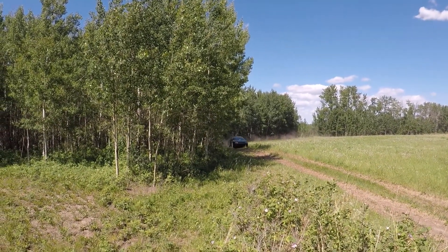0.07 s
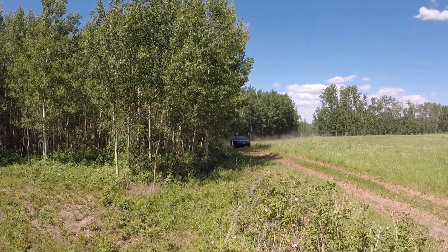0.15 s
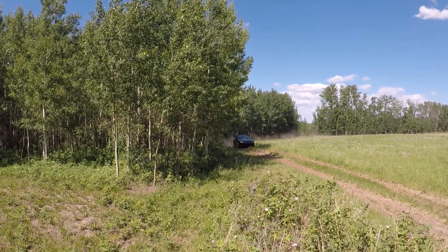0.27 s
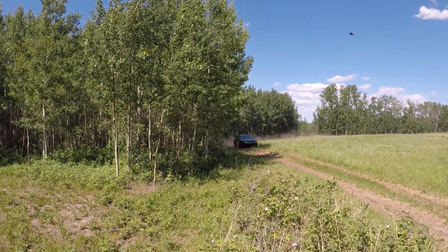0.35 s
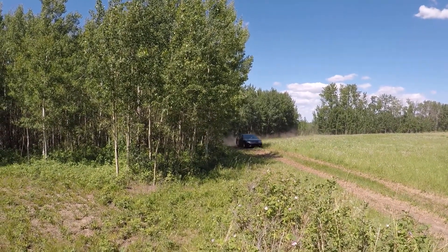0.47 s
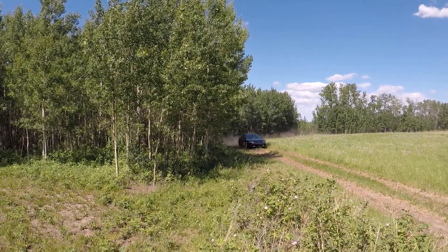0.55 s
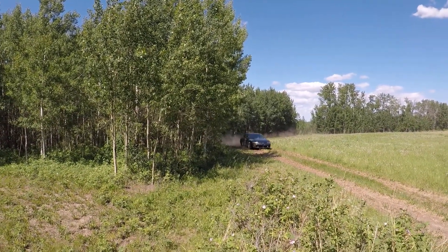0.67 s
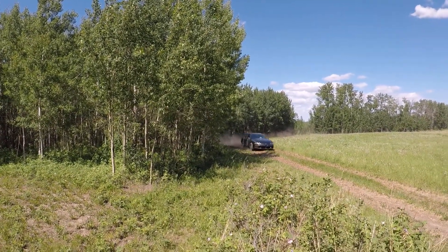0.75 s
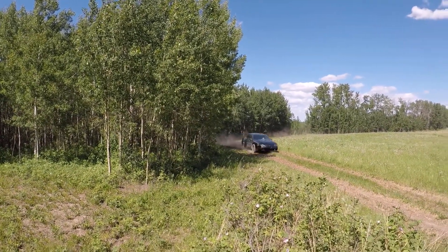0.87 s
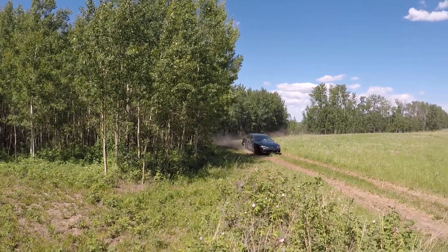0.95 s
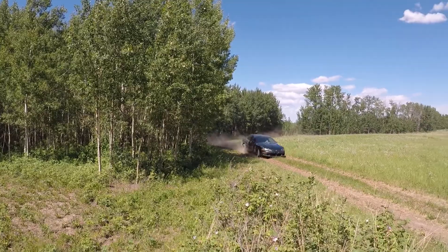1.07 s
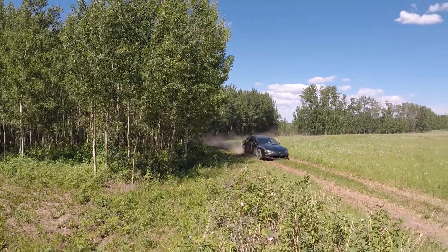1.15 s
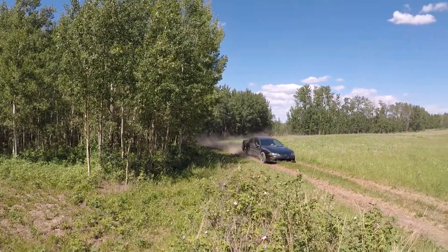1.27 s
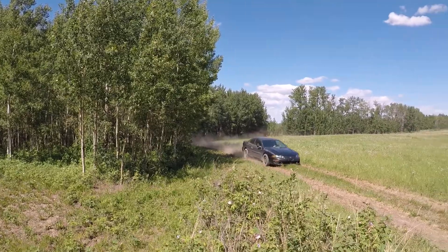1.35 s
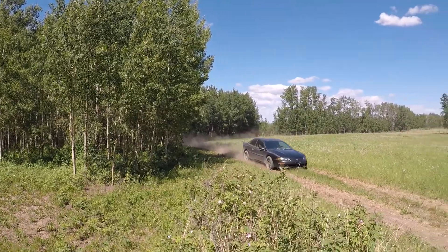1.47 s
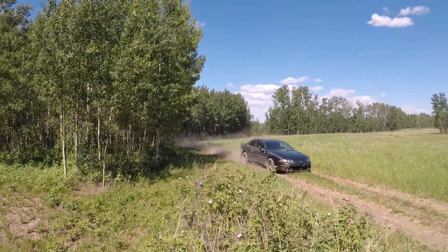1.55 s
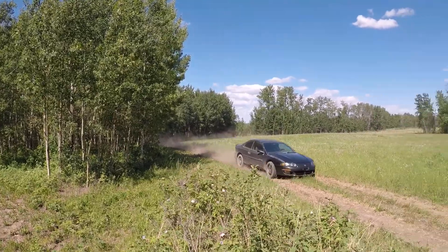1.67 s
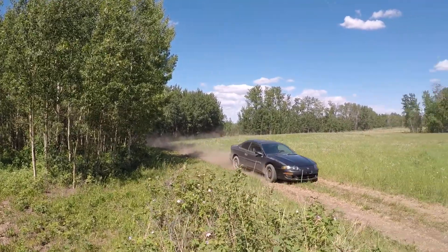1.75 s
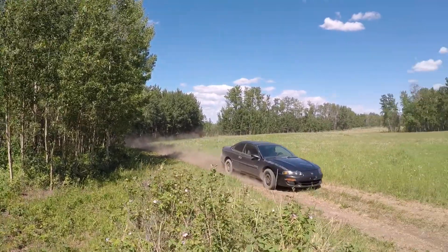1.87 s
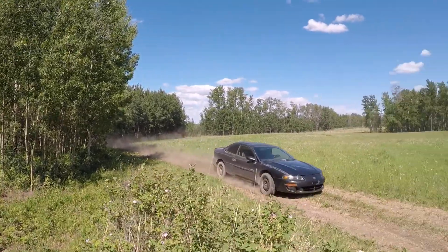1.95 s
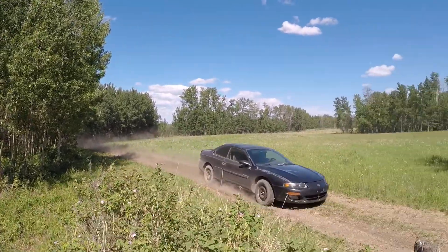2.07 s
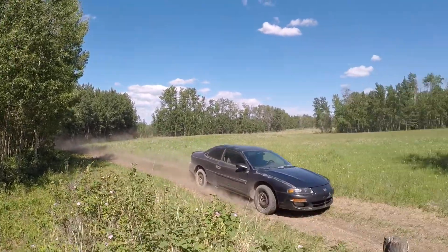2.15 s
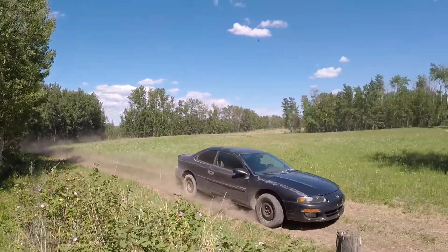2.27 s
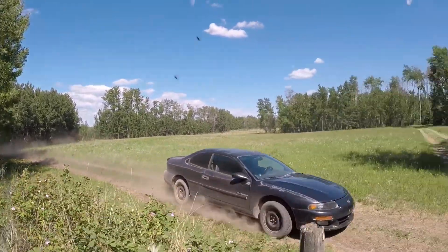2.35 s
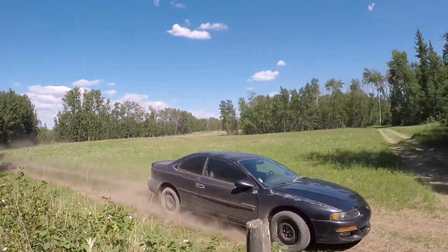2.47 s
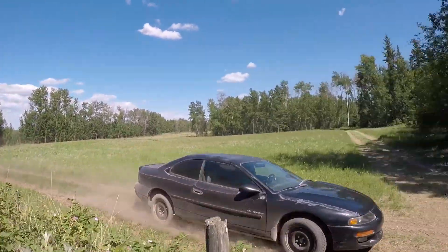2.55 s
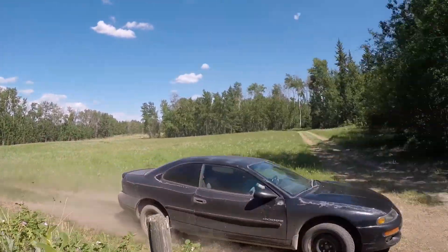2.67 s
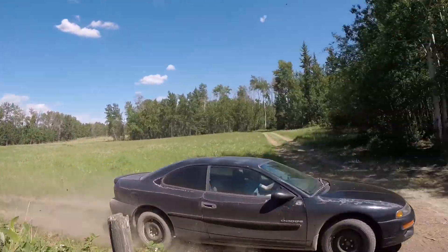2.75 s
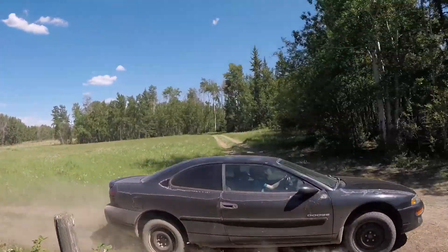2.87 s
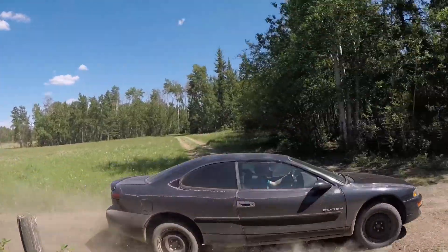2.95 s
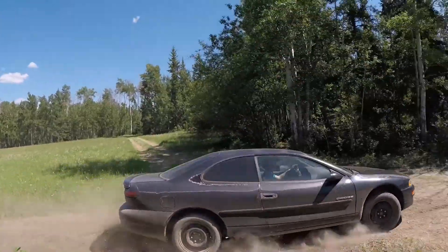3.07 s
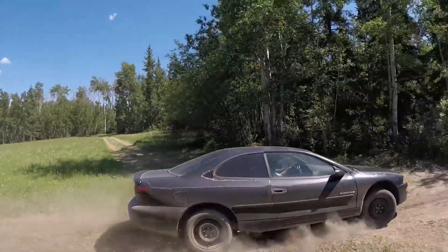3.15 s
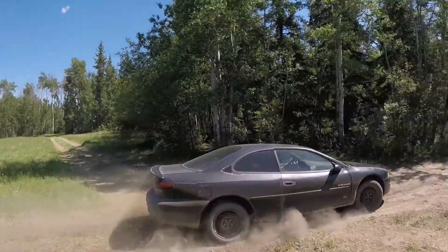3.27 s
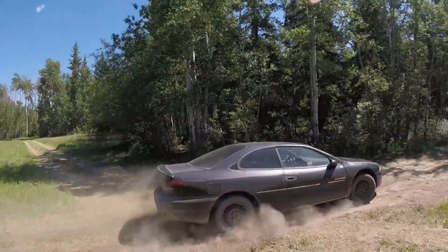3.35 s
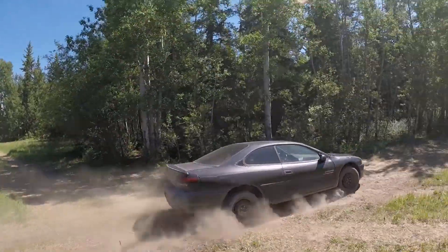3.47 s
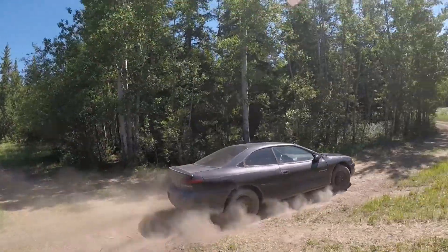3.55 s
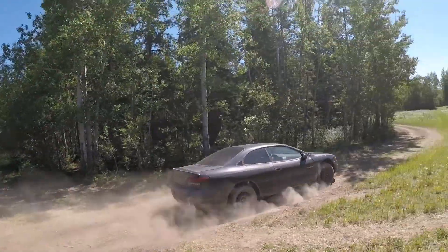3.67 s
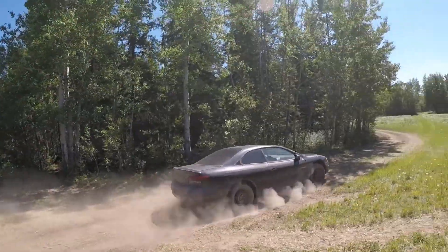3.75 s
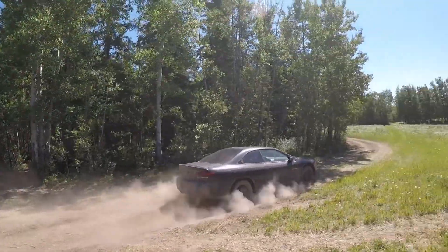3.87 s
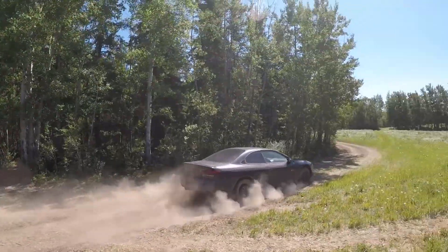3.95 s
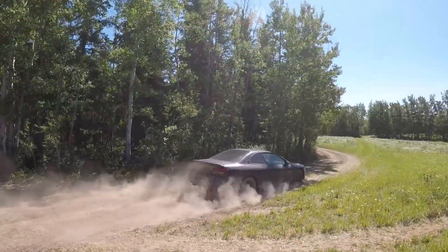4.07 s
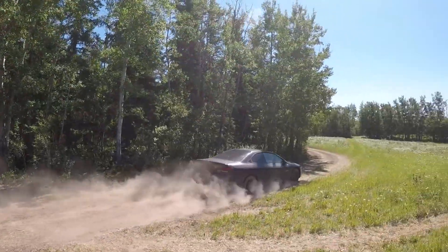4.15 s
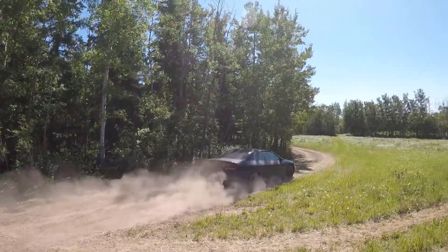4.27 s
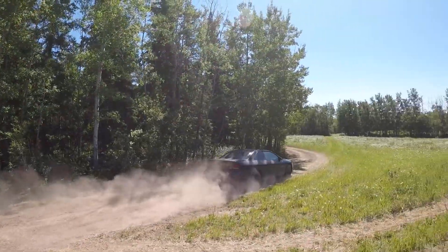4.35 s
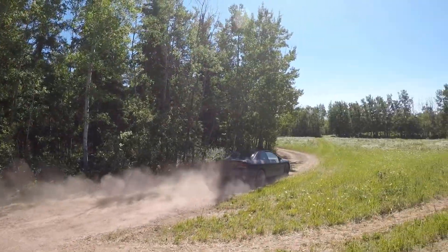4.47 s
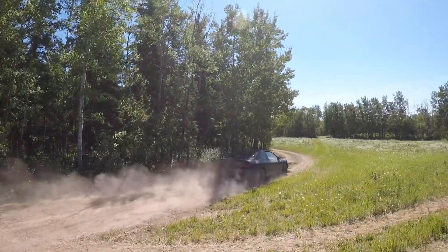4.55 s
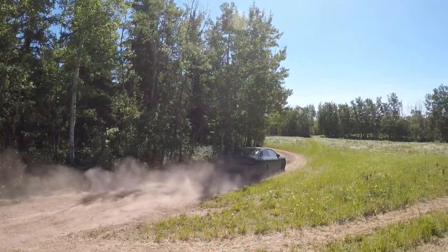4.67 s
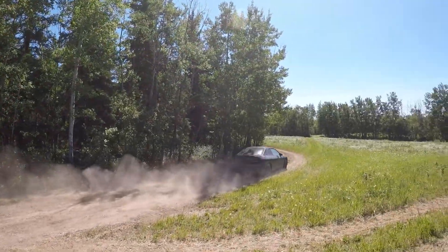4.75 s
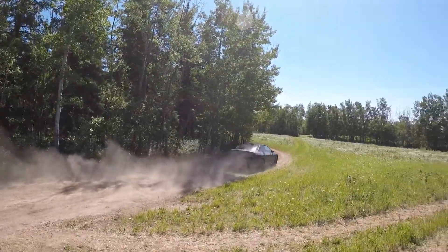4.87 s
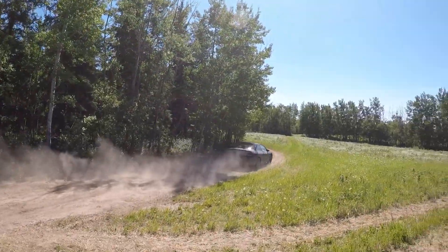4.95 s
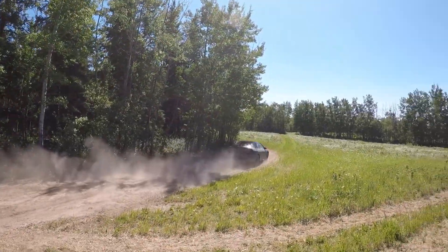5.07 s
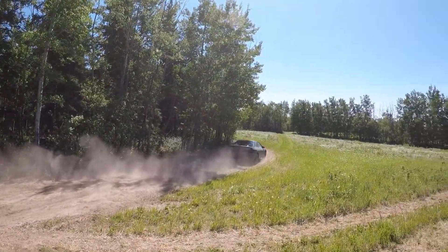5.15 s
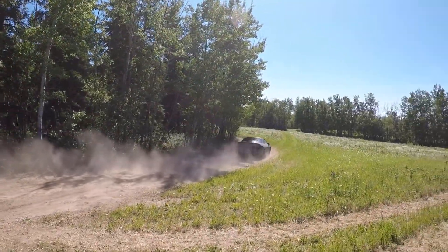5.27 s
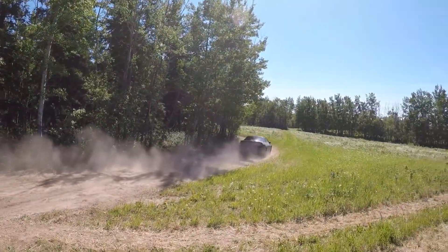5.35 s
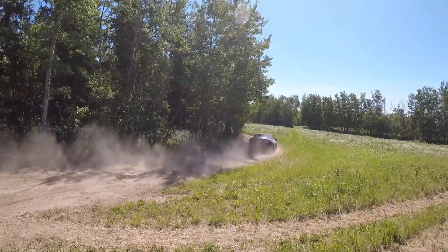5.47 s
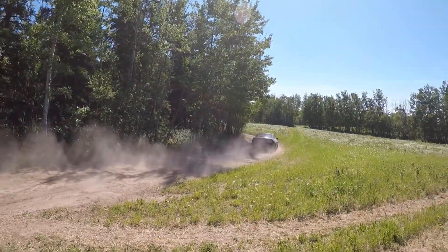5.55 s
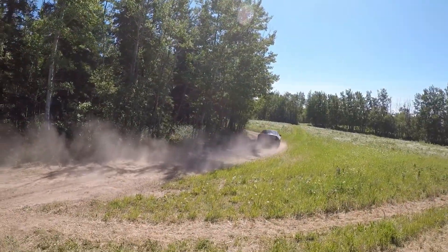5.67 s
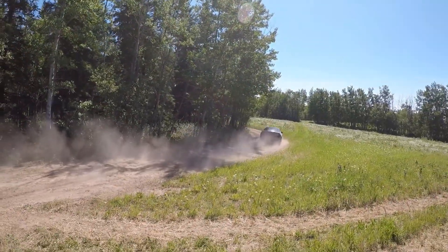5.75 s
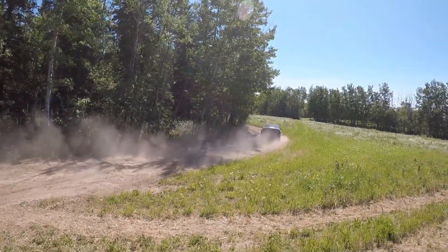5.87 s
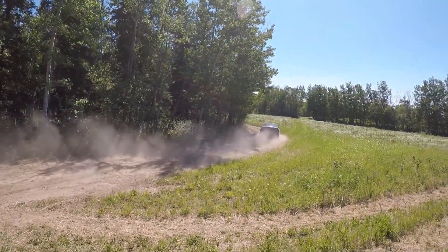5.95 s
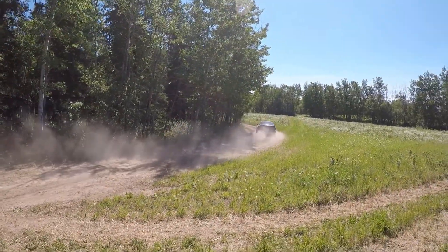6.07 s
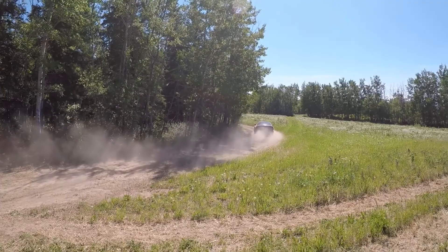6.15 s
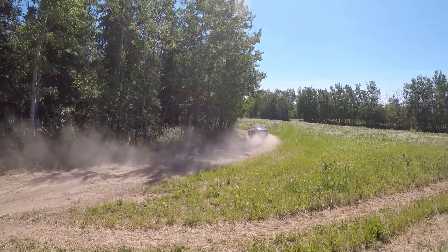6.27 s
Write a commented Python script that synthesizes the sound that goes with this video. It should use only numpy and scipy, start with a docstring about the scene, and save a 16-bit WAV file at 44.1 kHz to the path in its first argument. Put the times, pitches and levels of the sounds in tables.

```python
"""Heard first: a six-cylinder car droning in from afar on a dirt track, over faint leaves and light wind.
It lifts off, rounds a bend close by and revs away: sums of fluttering crankshaft orders plus puffed noise.
Tyres rumble, scrub, crunch and spray (coloured noise and grit), following the distance, with surges.
Suspension thumps and panel rings are damped modes; stalks, stones, pebbles and grass are bursts of noise or tone."""
import sys
import numpy as np
from scipy import signal
from scipy.fft import rfft, irfft, next_fast_len
from scipy.io import wavfile
from scipy.ndimage import map_coordinates

SR = 44100
rng = np.random.default_rng(int(sys.argv[2]) if len(sys.argv) > 2 else 0)


def file_out(sig):
    """Save sig as 16-bit WAV at sys.argv[1]."""
    # one column per channel
    cols = np.atleast_2d(sig).T
    # limit, then scale
    lim = np.clip(cols, -1, 1)
    pcm = np.round(lim * 32767).astype(np.int16)
    wavfile.write(sys.argv[1], SR, pcm)


N = 278712


def amp(db):
    """Decibels to gain."""
    return 10 ** (np.asarray(db) / 20)


def unit(x):
    """Scale to rms 1."""
    return x / np.sqrt(np.mean(x ** 2) + 1e-20)


def clock():
    """Time of every sample, s."""
    return np.arange(N) / SR


def curves(rows):
    """One value per sample for each column after the time."""
    s, *columns = np.transpose(rows)
    return [np.interp(clock(), s, column) for column in columns]


def wobble(knots_per_s):
    """Smooth random curve through normally distributed knots."""
    knots = rng.standard_normal(int(N * knots_per_s / SR) + 4)
    steps = np.arange(0, len(knots) - 1, 1 / 10)
    smooth = map_coordinates(knots, [steps])
    return np.interp(np.arange(N) * knots_per_s / SR, steps, smooth)


def swell(s, rise_s, fall_s):
    """Triangle from 0 up to 1 at time s and back."""
    return np.interp(clock(), [s - rise_s, s, s + fall_s], [0, 1, 0])


def during(rows, fade_s):
    """Gate open over the time of a table, with soft ends."""
    inside_s = np.minimum(clock() - rows[0][0], rows[-1][0] - clock())
    return np.clip(1 + inside_s / fade_s, 0, 1)


def add(track, s, sound):
    """Mix a sound into a track at time s."""
    part = track[round(s * SR):][:len(sound)]
    part += sound[:len(part)]


def coloured(x, points):
    """Filter x by (f/Hz, level/dB) points, interpolated on a log frequency axis."""
    m = next_fast_len(len(x) + SR // 4)
    hz, db = np.transpose(points)
    log_hz = np.log(np.fft.rfftfreq(m, 1 / SR) + 1)
    gain = amp(np.interp(log_hz, np.log(hz), db))
    return irfft(rfft(x, m) * gain, m)[:len(x)]


def noise(points):
    """Coloured noise of rms 1."""
    return unit(coloured(rng.standard_normal(N), points))


def grit(points, rate_per_s, spread_db, share):
    """Sparse impacts of uneven size (their share of the power) over a bed of steady noise."""
    sizes = rng.choice([-1, 1], N) * amp(spread_db * rng.uniform(-1.9, 2.3, N))
    hits = rng.random(N) < rate_per_s / SR
    grains = unit(coloured(sizes * hits, points))
    share = np.clip(share, 0, 1)
    return np.sqrt(share) * grains + np.sqrt(1 - share) * noise(points)


# closest approach
PASS_S, CLOSEST_M, SPEED_M_PER_S = 2.963, 5.01, 8.87


def nearness():
    """Closest distance over present distance: 1 as the car passes."""
    return CLOSEST_M / np.hypot(CLOSEST_M, SPEED_M_PER_S * (clock() - PASS_S))


# slowest at the bend exit; SLOWING_S each for slowing and recovery
SLOWEST_S, SLOWING_S, SLOW_DB = 4.234, 0.34, 1.5


def passing(db, share):
    """Level/dB of a rolling sound: share scales its distance loss and its dip as the car slows."""
    distance_db = 20 * np.log10(nearness())
    slow_db = SLOW_DB * swell(SLOWEST_S, SLOWING_S, SLOWING_S)
    return db + share * (distance_db - slow_db)


# loss at the start, gone by CLEAR_S
SCREEN_DB, CLEAR_S = 8, 0.34


def screened():
    """Loss/dB of road boom and exhaust rasp while trees screen the car."""
    return SCREEN_DB * np.clip(1 - clock() / CLEAR_S, 0, 1)


def crank(speed_hz):
    """Crankshaft angle/rad, slightly unsteady."""
    return 2 * np.pi * np.cumsum(speed_hz * (1 + 0.003 * wobble(25))) / SR


def orders(turn, table, rough_db):
    """Sines at multiples of the crankshaft speed, each fluttering in strength."""
    total = 0
    for multiple, db in table:
        phase = 2 * np.pi * rng.random()
        total = total + amp(db + rough_db * wobble(28)) * np.sin(multiple * turn + phase)
    return np.sqrt(2) * total


# muffler resonances swept by the orders [f/Hz, level/dB]
MUFFLER_RESONANCES = [(110, -7), (165, 6.5), (215, 0), (250, -3), (280, 1), (400, -0.5), (600, -4.5)]


def overtones(speed_hz, turn, table, rough_db):
    """Orders that swell and fade as they cross the resonances of the muffler."""
    hz, db = np.transpose(MUFFLER_RESONANCES)
    total = 0
    for row in table:
        resonance_db = np.interp(row[0] * speed_hz, hz, db)
        total = total + amp(resonance_db) * orders(turn, [row], rough_db)
    return total


# pipe resonance [f/Hz, level/dB]
PIPE_RESONANCE = [(200, -14), (310, -13), (370, 0.5), (430, -1), (480, -6), (560, -16.5), (800, -18.5),
                  (1200, -24), (3000, -57)]


def rasp(turn, depth):
    """Each firing pushes a puff of noise through the pipe resonance."""
    puffs = rng.standard_normal(N) * (1 + depth * np.cos(3 * turn))
    return amp(0.35 * wobble(12)) * unit(coloured(puffs, PIPE_RESONANCE))


# engine speed, coming [t/s, crankshaft f/Hz]
COMING_SPEED = [(0, 47.02), (.41, 59), (.53, 54.12), (.68, 47.26), (.87, 51.54), (1.0, 49.3), (1.57, 47.76),
                (1.79, 54), (2.0, 55.5)]
# swells of the far drone [t/s, half length/s, gain/dB]
DRONE_SWELLS = [(.14, 0.39, 9.5), (0.556, 0.08, 10), (0.858, 0.11, 9.5), (1.11, 0.084, 7.5),
                (1.35, 0.12, 4)]
# exhaust overtones from the front [multiple of crankshaft speed, level/dB]
FRONT_ORDERS = [(2, -7), (4, -11), (6, -19.5), (6.5, -25), (7, -19), (9, -23.5)]
# drone between swells, overtones and rasp; overtones fade as the throttle eases
DRONE_DB, FRONT_DB, FRONT_RASP_DB, EASE_DB_PER_S = -38.5, -31.5, -36.5, 4


def engine_coming():
    """Three firings a turn drone from far off, swelling and fading again and again."""
    speed_hz, = curves(COMING_SPEED)
    turn = crank(speed_hz)
    firing_db = DRONE_DB + sum(db * swell(s, half_s, half_s) for s, half_s, db in DRONE_SWELLS)
    drone = amp(firing_db) * orders(turn, [(3, 0)], rough_db=2.2)
    snarl_db = FRONT_DB - EASE_DB_PER_S * clock()
    snarl = amp(snarl_db) * overtones(speed_hz, turn, FRONT_ORDERS, rough_db=2)
    puffs_db = passing(FRONT_RASP_DB, share=0.65) - screened()
    puffs = amp(puffs_db) * rasp(turn, depth=0.78)
    return during(COMING_SPEED, fade_s=0.32) * (drone + snarl + puffs)


# (level/dB at the closest point before slowing and surges, share of distance loss)
ROAD, SCRUBBING, CRUNCHING, SPRAYING = (-26.5, 0.84), (-36, 1), (-49.5, 0.76), (-56, 0.52)
# surges [t/s, rise/s, fall/s, road boom change/dB, scrub change/dB, crunch change/dB, spray change/dB]
SURGES = [(.47, 0.45, .35, 2, 1.5, 3.5, -1), (1.95, 0.094, 0.58, 3.5, 3, 1, -4),
          (2.48, .12, 0.58, 0.5, 2, 1, 5), (3.2, 0.094, 0.21, 5.5, 3.5, 5.5, 2.5),
          (3.63, 0.27, 0.22, 2, 1.5, 2.5, 2), (4.6, 0.53, 0.61, 0.5, 3, 3.5, 4.5),
          (5.55, 0.43, 0.26, -0.5, 3, -1, 4.5), (6.2, 0.23, .3, 0.5, 2, -1, 3)]


def rolling_levels():
    """Road boom, scrub, crunch and spray/dB: set by the pass, with surges up and down."""
    surges_db = sum(np.outer(change_db, swell(s, rise_s, fall_s))
                    for s, rise_s, fall_s, *change_db in SURGES)
    pass_db = [passing(*sound) for sound in (ROAD, SCRUBBING, CRUNCHING, SPRAYING)]
    return np.array(pass_db) + surges_db


# road boom spectrum [f/Hz, level/dB]
RUMBLE_SPECTRUM = [(40, -39), (85, -5.5), (150, 0), (240, -7), (300, -9), (400, -21), (650, -42),
                   (1500, -79)]


def road_boom():
    """The body booms over the ruts: low noise of uneven level."""
    road_db = rolling_levels()[0] - screened()
    return amp(road_db + 1.5 * wobble(18)) * noise(RUMBLE_SPECTRUM)


# wind [t/s, level/dB]
WIND_LEVEL = [(0, -53), (.4, -47), (.8, -40), (1.3, -36), (1.7, -34.5), (2.05, -29.5), (2.45, -26.5),
              (3.2, -26), (3.45, -24.5), (3.75, -32.5), (4.1, -31), (4.8, -27.5), (5.5, -29), (5.85, -31),
              (6.32, -31)]
# wind spectrum [f/Hz, level/dB]
BUFFET_SPECTRUM = [(10, -11.5), (25, 3), (55, -0.5), (85, 1), (130, -5.5), (250, -23), (600, -90)]


def wind():
    """Air buffets the microphone: deep noise in slow gusts."""
    buffet_db, = curves(WIND_LEVEL)
    return amp(buffet_db + 1.2 * wobble(2.7)) * noise(BUFFET_SPECTRUM)


# first reinforced pitch of the comb, far off and close by
COMB_FAR_HZ, COMB_NEAR_HZ = 327, 648


def comb_colouring(x, depth):
    """Sound plus a delayed copy of itself: a hollow pitch that rises as the car nears."""
    pitch_hz = COMB_FAR_HZ + (COMB_NEAR_HZ - COMB_FAR_HZ) * nearness()
    late = map_coordinates(x, [np.arange(N) - SR / pitch_hz], order=1)
    return unit(x + depth * late)


# tyre spectra, each [f/Hz, level/dB]: soil scrub, crushed grit, flung dirt
SCRUB_SPECTRUM = [(150, -40), (300, 1.5), (420, 2.5), (560, 3), (750, -2), (950, -7), (1250, -7),
                  (1700, -14), (3000, -39), (8000, -61)]
CRUNCH_SPECTRUM = [(800, -31), (1600, 0.5), (2400, 2), (3300, -5.5), (4150, -0.5), (5100, -7), (6500, -9.5),
                   (12000, -54)]
SPRAY_SPECTRUM = [(3000, -31), (5300, -4.5), (6500, 2), (7700, 1), (8700, -2.5), (10200, -5), (11200, -14),
                  (12500, -13), (15000, -20)]


def tyres():
    """Treads scrub the soil, crush grit and fling a spray of dirt, in clumps."""
    _, scrub_db, crunch_db, spray_db = rolling_levels()
    clumps = wobble(30)
    comb_depth = 0.22 * np.sqrt(nearness())  # deepens as the car nears
    soil = comb_colouring(grit(SCRUB_SPECTRUM, rate_per_s=400, spread_db=2.5, share=0.26), comb_depth)
    crushed = grit(CRUNCH_SPECTRUM, rate_per_s=640, spread_db=5.5, share=0.13)
    flung = grit(SPRAY_SPECTRUM, rate_per_s=1200, spread_db=11.5, share=0.27)
    scrub = amp(scrub_db + 1.6 * clumps) * soil
    crunch = amp(crunch_db + 1.45 * clumps) * crushed
    spray = amp(spray_db + 0.93 * clumps) * flung
    return scrub + crunch + spray


LEAVES_DB = -59
# leaf rustle spectrum [f/Hz, level/dB]
LEAVES_SPECTRUM = [(600, -1), (1100, 1), (2400, -1.5), (3300, -4.5), (4200, -3.5), (6000, -14.5),
                   (9500, -9.5), (11500, -15), (14000, -21), (15200, -23)]


def leaves():
    """A faint, even rustle from the trees: fine grit over noise."""
    rustle = grit(LEAVES_SPECTRUM, rate_per_s=590, spread_db=4, share=0.091)
    return amp(LEAVES_DB + 0.38 * wobble(3.6)) * rustle


def pebbles(count=110):
    """Pebbles click under the wheels in decaying two-tone rings that follow the crunch level."""
    _, _, crunch_db, _ = rolling_levels()
    out, t = np.zeros(N), np.arange(SR // 20) / SR
    for when, size, pitch, life in rng.random((count, 4)):
        hz = 1400 * 4 ** pitch
        t60_s = 0.016 + 0.022 * life
        ring = np.sin(2 * np.pi * hz * t) + 1.16 * np.sin(2 * np.pi * 1.37 * hz * t)
        add(out, when * N / SR, amp(-12 * size - 60 * t / t60_s) * ring)
    return amp(crunch_db + 10) * nearness() ** .25 * out


# suspension over ruts [t/s, level/dB, f/Hz, t60/s]
THUMPS = [(.772, -15.5, 272, 0.025), (1.159, -21.5, 165.9, 0.13), (2.545, -15, 202, 0.073),
          (3.142, -14, 228, 0.12), (3.151, -24, 673, 0.098), (3.156, -13.5, 277, 0.073),
          (4.55, -11.5, 78.6, 0.12)]


def thumps():
    """A wheel drops into a rut and sets a few heavily damped body modes going."""
    out, t = np.zeros(N), np.arange(SR // 3) / SR
    for s, db, hz, t60_s in THUMPS:
        modes = sum(amp(level_db) * np.sin(2 * np.pi * hz * ratio * t)
                    for ratio, level_db in [(.6, -9), (1, 2.5), (1.35, -25), (2.2, -10)])
        add(out, s, amp(db - 60 * t / t60_s) * (1 - np.exp(-t / 0.00061)) * modes)
    # rubber bushes soften the blow
    return signal.sosfilt(signal.butter(2, 900, fs=SR, output="sos"), out)


# dry stalks [t/s, level/dB]
SNAPS = [(0.8232, -44), (1.0884, -41), (1.2726, -29), (1.3933, -42), (1.6099, -42), (1.6864, -40),
         (2.861, -39), (3.0367, -36), (4.595, -40.5), (5.32, -45)]
SNAP_T60_S = .012


def snaps():
    """Dry stalks break with a bright tick of decaying noise."""
    ticks, t = np.zeros(N), np.arange(SR // 10) / SR
    for s, db in SNAPS:
        add(ticks, s, amp(db - 60 * t / SNAP_T60_S))
    return ticks * noise([(2000, -3), (4200, 1), (9000, 3.0), (13000, -8), (15000, -16)])


# stones and clods on the body [t/s, level/dB, f/Hz, ring level/dB]
STONES = [(1.197, -27.5, 4300, -10), (1.905, -37.5, 2000, -16), (2.627, -29.5, 3080, -13.5),
          (3.185, -23.5, 1896, -15), (3.205, -27.5, 2800, -8.5), (3.23, -26.5, 2340, -16),
          (3.301, -23, 2507, -21), (3.446, -30.5, 1690, -15), (3.509, -27.5, 2010, -17),
          (3.605, -41, 3300, -4), (3.709, -32, 1500, -15), (4.3, -39, 5800, -12), (4.937, -33, 1026, -10),
          (5.478, -41.5, 1493, 1), (6.006, -39.5, 1792, -8), (6.148, -45, 2090, -8),
          (6.25, -41.5, 1600, -6)]
# rattle spectrum [f/Hz, level/dB]
STONE_SPECTRUM = [(400, 4.5), (1300, 7), (2400, 4), (3400, -5), (4400, -1.5), (6300, -7), (8000, -17),
                  (15000, -49)]
# t60 at a 0 dB blow; share of the blow's level that the decay follows
STONE_T60_S, DECAY_FOLLOWS = 0.18, 0.23


def stones():
    """Each stone rattles like grit, longer for a harder blow, and briefly rings the panel it hits."""
    rattle, ring, t = np.zeros(N), np.zeros(N), np.arange(SR // 4) / SR
    for s, db, hz, ring_db in STONES:
        t60_s = STONE_T60_S * amp(DECAY_FOLLOWS * db)
        burst = amp(db - 60 * t / t60_s) * (1 - np.exp(-t / 0.0011))
        add(rattle, s, burst)
        modes = sum(amp(level_db) * np.sin(2 * np.pi * (hz * ratio * t + rng.random()))
                    for ratio, level_db in [(.62, -12), (.93, 1), (1, 2.5), (1.1, -5.5)])
        add(ring, s, amp(ring_db) * burst * modes)
    grains = grit(STONE_SPECTRUM, rate_per_s=3000, spread_db=0.5, share=0.88)
    return amp(-4.0) * rattle * grains + ring


# grass and stalks on the bumper [t/s, level/dB, rise/(dB/s), fall/(dB/s)]
TUFTS = [(1.35, -45, 27.5, 29), (1.29, -35, 220, 90), (1.395, -37, 260, 128)]
# grass spectrum [f/Hz, level/dB]
GRASS_SPECTRUM = [(600, -5), (1300, -4.5), (2400, -3), (3200, -5.5), (4200, 1), (5100, -7.5), (6400, -5.5),
                  (7600, -12.5), (8500, -5.5), (11000, -25.5), (12500, -21), (15000, -32)]


def brush():
    """The bumper mows through tufts of dry grass: a bright, clumped crackle."""
    t = clock()
    tufts_db = [db - np.maximum(rise * (s - t), fall * (t - s)) for s, db, rise, fall in TUFTS]
    clumps = np.tanh(wobble(90))
    crackle = grit(GRASS_SPECTRUM, rate_per_s=900, spread_db=10, share=0.35)
    return amp(np.max(tufts_db, axis=0) + 2.06 * clumps) * crackle


# engine speed, coasting [t/s, crankshaft f/Hz]
COASTING_SPEED = [(2.0, 54.53), (2.6, 57.18), (3.15, 56.98), (3.9, 48.73), (4.2, 47.44)]
# exhaust orders from the side [multiple of crankshaft speed, level/dB]
FLANK_ORDERS = [(1, 0), (2, -1), (3, -2), (4, -1), (5, -5.5)]
# loudest once the tailpipe has gone by, fading either side
COAST_DB, COAST_PEAK_S, COAST_FADE_DB_PER_S = -29.5, 3.074, 10.5


def engine_coasting():
    """Unloaded, the engine burbles unevenly through the bend: low orders with strong flutter."""
    speed_hz, = curves(COASTING_SPEED)
    db = COAST_DB - COAST_FADE_DB_PER_S * np.abs(clock() - COAST_PEAK_S)
    burble = orders(crank(speed_hz), FLANK_ORDERS, rough_db=3.5)
    return during(COASTING_SPEED, fade_s=0.039) * amp(db) * burble


# engine speed, leaving [t/s, crankshaft f/Hz]
LEAVING_SPEED = [(4.18, 24.35), (4.42, 42), (4.5, 49.85), (4.7, 54.82), (5.14, 57.33), (5.45, 57.55),
                 (5.6, 54.03), (5.75, 49.45), (6.32, 50)]
# throttle eased from LIFT_S
LIFT_S, LIFT_TAKES_S = 5.063, 0.31


def under_load(db, eased_db, drift_db_per_s):
    """Exhaust level/dB: changes as the throttle is eased, drifts as the car turns away."""
    eased = np.clip((clock() - LIFT_S) / LIFT_TAKES_S, 0, 1)
    return db + eased_db * eased + drift_db_per_s * (clock() - LEAVING_SPEED[0][0])


# tailpipe booms and cancellations [f/Hz, level/dB]
TAILPIPE_RESPONSE = [(48, -7), (63, -2.5), (85, -5), (98, -11.5), (107, -2), (114, 0), (128, -7), (150, -2),
                     (172, -1.5)]
# exhaust overtones from the rear [multiple of crankshaft speed, level/dB]
REAR_ORDERS = [(4, 2.5), (5, -1), (6, -2), (7, -20), (7.5, -14.5), (8, -12), (10, -16), (12, -20),
               (14, -21)]
# (level/dB before easing and drift, change on easing/dB, drift/(dB/s))
FIRING, SECOND = (-27, 1.25, 1.3), (-23, 0, 0)
SNARL, RASPING = (-31.5, -6, -4), (-41.5, -2, -1.3)
BUILD_UP_S = 0.2  # of firing and snarl, after the throttle opens


def engine_leaving():
    """Under load the tailpipe booms; unequal cylinder banks add orders beside the firing rate."""
    speed_hz, = curves(LEAVING_SPEED)
    turn = crank(speed_hz)
    pipe_hz, pipe_db = np.transpose(TAILPIPE_RESPONSE)
    firing_db = under_load(*FIRING) + np.interp(3 * speed_hz, pipe_hz, pipe_db)
    second_db = under_load(*SECOND) + np.interp(2 * speed_hz, pipe_hz, pipe_db)
    firing = amp(firing_db) * orders(turn, [(3, 0)], rough_db=1.36)
    second = amp(second_db) * orders(turn, [(2, 0)], rough_db=0.8)
    snarl = amp(under_load(*SNARL)) * overtones(speed_hz, turn, REAR_ORDERS, rough_db=1.5)
    puffs = amp(under_load(*RASPING)) * rasp(turn, depth=0.65)
    build_up = np.clip((clock() - LEAVING_SPEED[0][0]) / BUILD_UP_S, 0, 1)
    return during(LEAVING_SPEED, fade_s=0.051) * (second + puffs + build_up * (firing + snarl))


def scene():
    """The car comes, passes and leaves."""
    engine = engine_coming() + engine_coasting() + engine_leaving()
    rolling = road_boom() + tyres() + pebbles()
    impacts = thumps() + snaps() + stones()
    return (engine + rolling + impacts + brush() + wind() + leaves())[None]


TOP_HZ = 15250


def record(dry):
    """Brick-wall low-pass at the band limit."""
    m = next_fast_len(N + SR // 4)
    passed = np.fft.rfftfreq(m, 1 / SR) < TOP_HZ
    return irfft(rfft(dry, m) * passed, m)[..., :N]


dry = scene()
out = record(dry)
file_out(out)
```